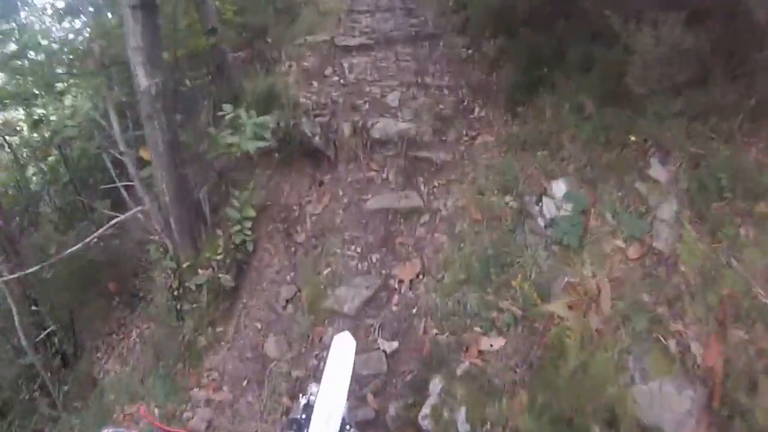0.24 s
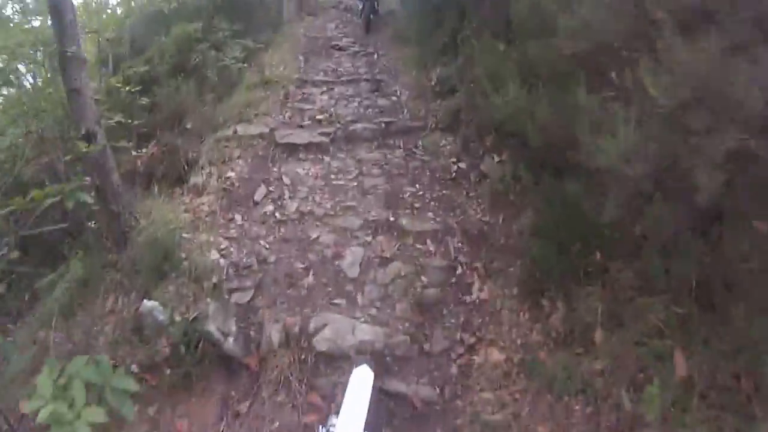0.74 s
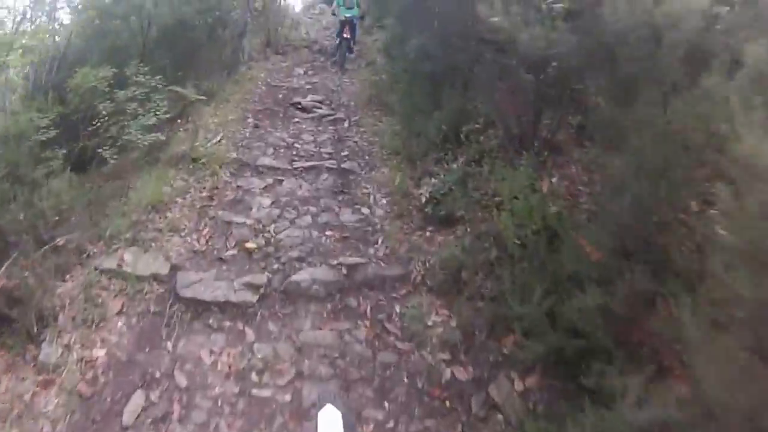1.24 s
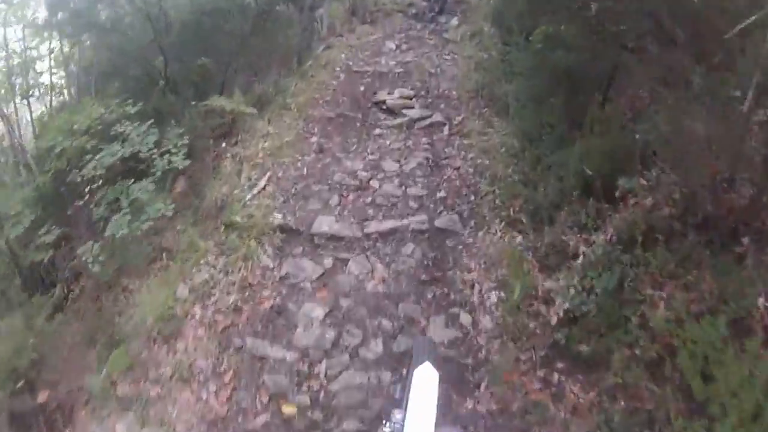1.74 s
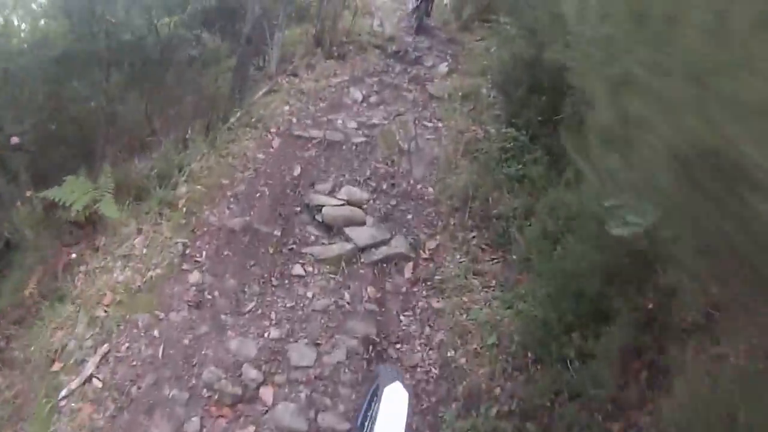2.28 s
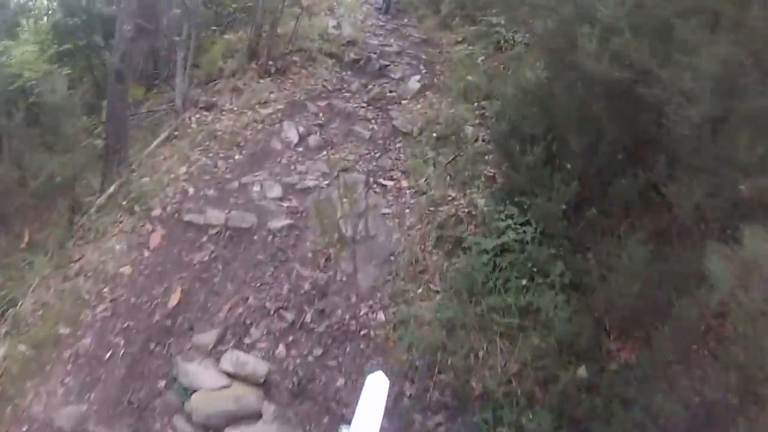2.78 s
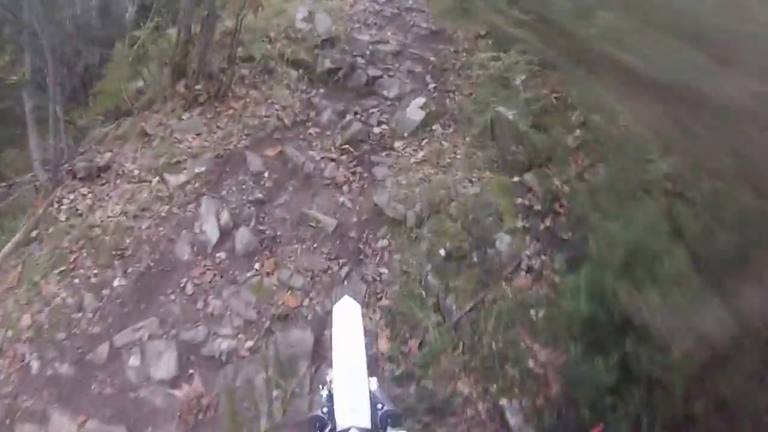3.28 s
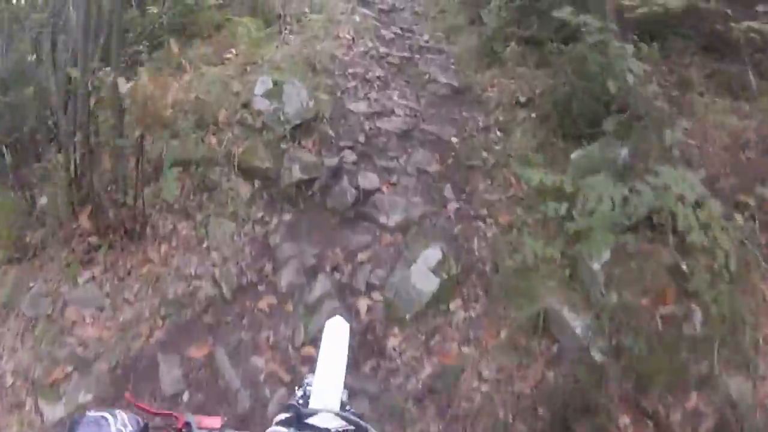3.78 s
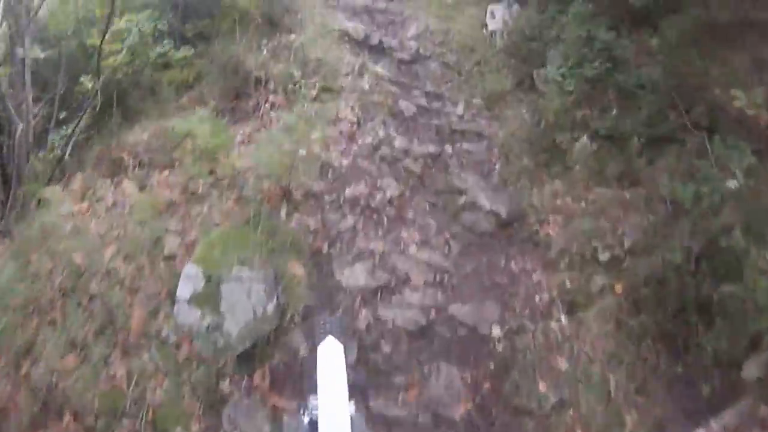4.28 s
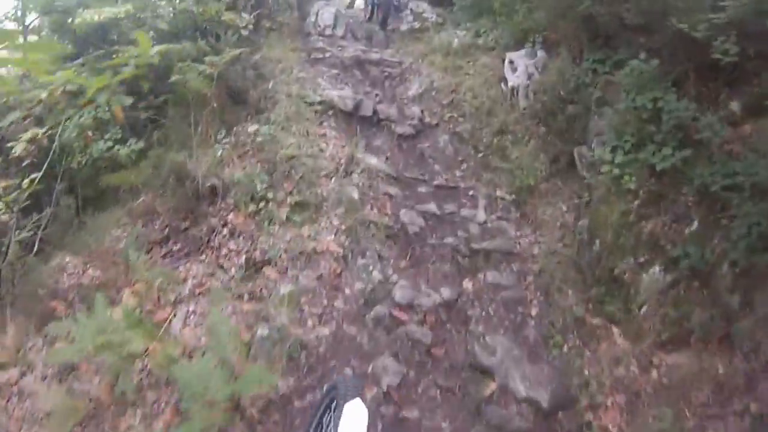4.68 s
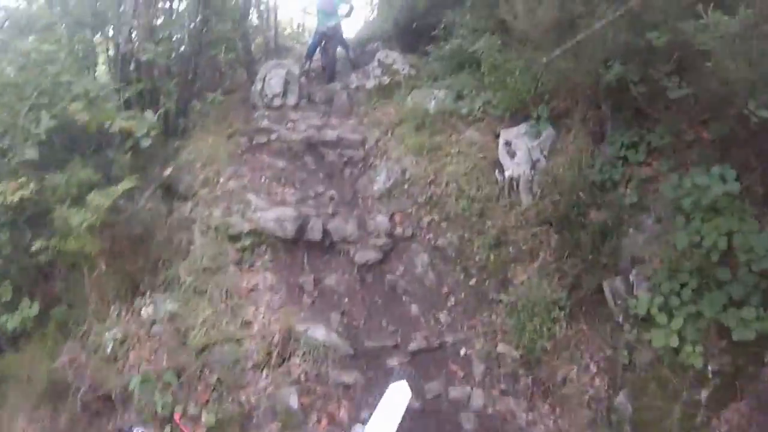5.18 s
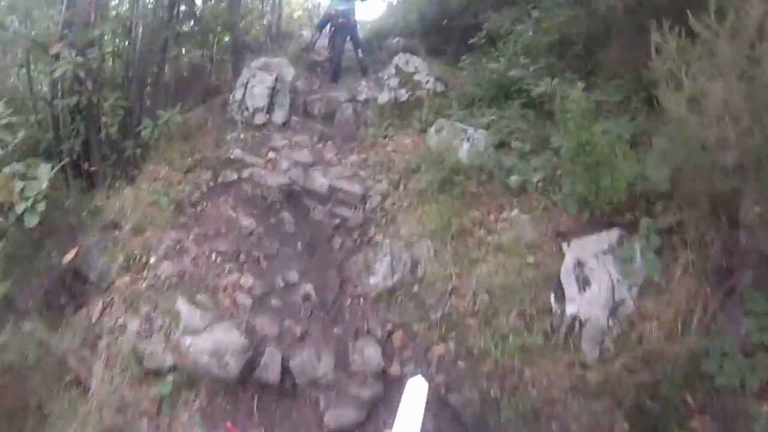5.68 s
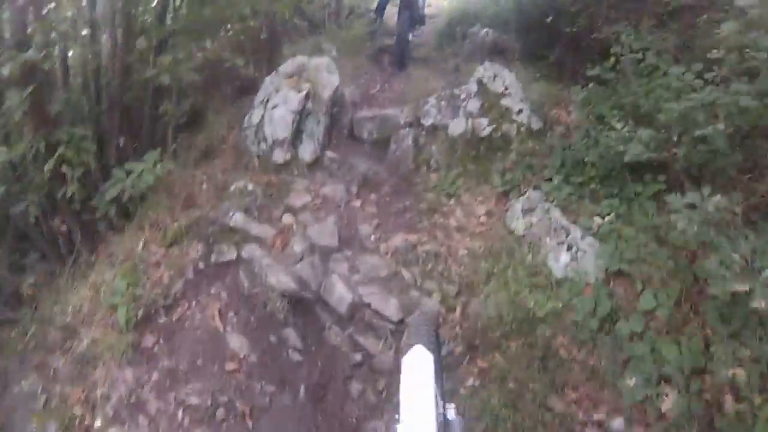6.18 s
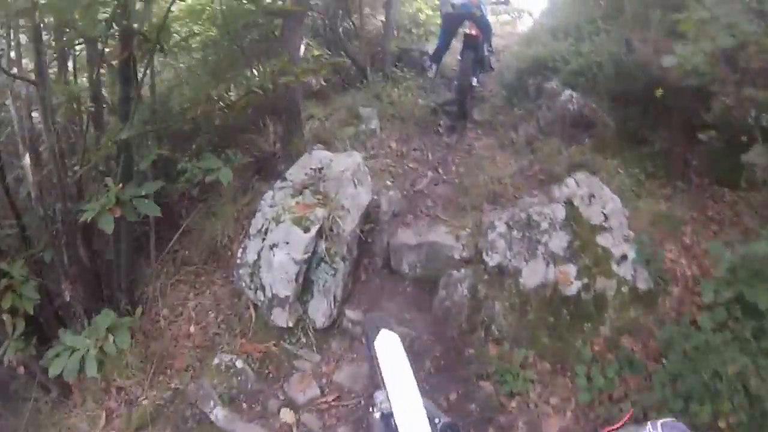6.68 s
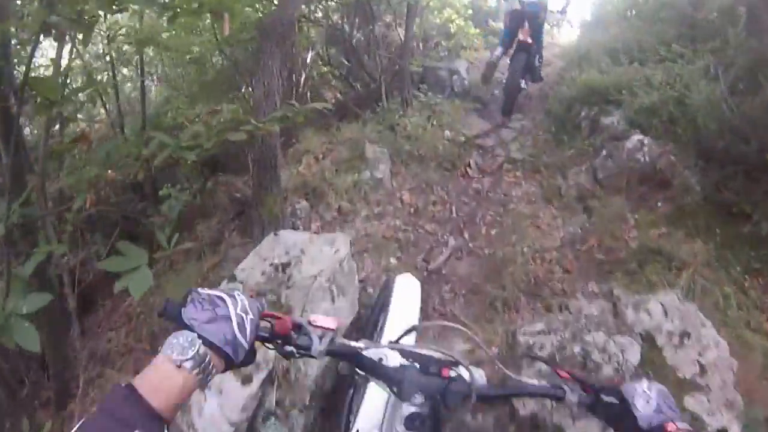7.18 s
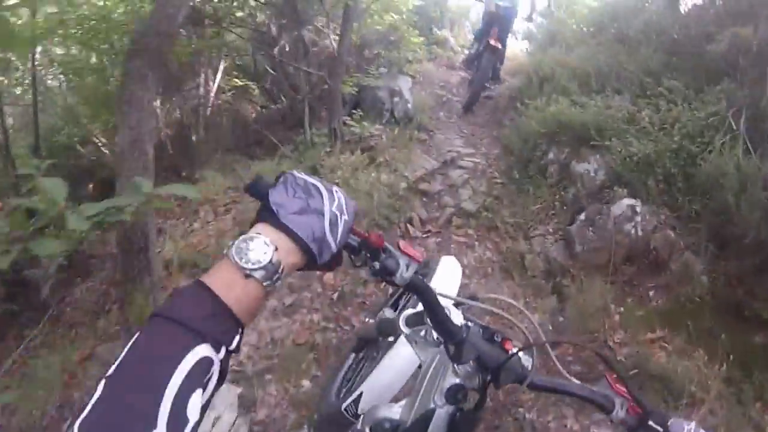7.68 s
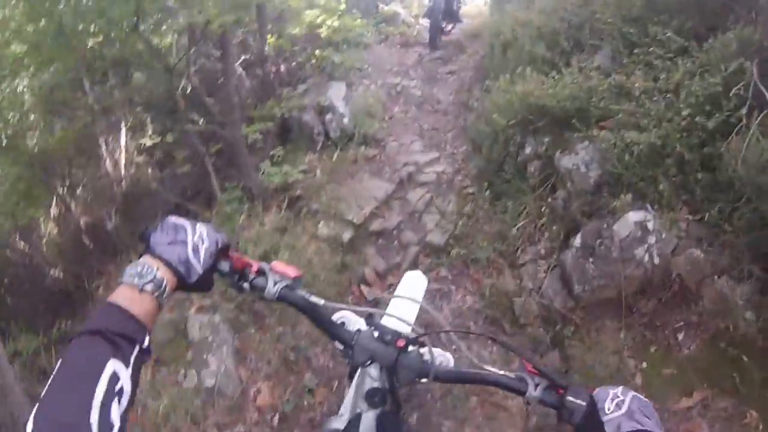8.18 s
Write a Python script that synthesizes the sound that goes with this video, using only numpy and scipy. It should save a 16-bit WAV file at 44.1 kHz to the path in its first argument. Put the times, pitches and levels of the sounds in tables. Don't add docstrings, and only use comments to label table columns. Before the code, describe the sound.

Small motorbike engine revving in short bursts, misfiring between them, with low thuds, rattling case knocks and a brief twig scrape, heard from inside a helmet camera.

```python
import sys
import numpy as np
from scipy import signal
from scipy.fft import rfft, irfft
from scipy.io import wavfile
from scipy.ndimage import uniform_filter1d

SR = 44100
rng = np.random.default_rng(int(sys.argv[2]) if len(sys.argv) > 2 else 0)


def to_wav(sig):
    pcm = np.clip(np.atleast_2d(sig), -1, 1) * 32767
    pcm = np.round(pcm).astype(np.int16)
    wavfile.write(sys.argv[1], SR, pcm.T)


def ratio_of_db(decibels):
    return 10 ** (np.asarray(decibels, float) / 20)


N = 372204

# start in seconds, end in seconds, intake roar in dB,
# air box pitch in Hz, crank speed reached in turns per second.
TWISTS = [(0.181, 0.45, -60.5, 1057, 48.4), (.76, 0.946, -56, 1033, 47), (1.019, 1.22, -68, 930, 50.6),
          (1.551, 1.922, -61, 946, 48.7), (2.281, 2.458, -60.5, 900, 42.4), (2.49, 2.772, -69, 930, 40.5),
          (2.779, 3.2, -60, 1020, 45.2), (3.219, 3.399, -61.5, 905, 41.2), (3.451, 3.64, -66, 935, 46),
          (3.743, 4.4, -63, 920, 43.8), (4.929, 5.149, -61, 940, 46.4), (5.55, 5.881, -71, 890, 42.8),
          (6.199, 6.41, -70, 920, 43.7), (6.601, 6.879, -67, 935, 42.4), (7.02, 7.501, -73, 944, 45),
          (7.701, 8.101, -65.5, 950, 45), (8.11, 8.601, -63, 955, 40)]
# time in seconds, level in dB.
ENGINE_LOAD = [(0, -58.5), (.23, -54), (.4, -64.5), (.61, -61.5), (.82, -56.5), (1.05, -61), (2.7, -59.5),
               (4.09, -58), (4.5, -62.5), (6.6, -59.5), (6.85, -65), (7.03, -64.5), (7.29, -58),
               (7.62, -66), (7.75, -58), (8.05, -56.5), (8.2, -55.5), (8.44, -62)]
# first full firing in seconds, last in seconds.
MISFIRE_STRETCHES = [(.42, .62), (1.04, 1.13), (1.37, 1.53), (1.935, 1.98), (2.056, 2.216), (2.337, 2.628),
                     (3.099, 3.14), (3.204, 3.39), (3.49, 3.71), (3.83, 4.145), (4.35, 4.715), (5.34, 5.47),
                     (6.6, 6.74), (6.82, 7.16), (7.4, 7.65)]
# centre in Hz, width in Hz, level in dB.
EXHAUST_PEAKS = [(234, 97, -3), (305.4, 132, -4.5), (540, 760, -3.5)]
# centre in Hz, width in Hz, level in dB.
METAL_PEAKS = [(1200, 450, -1), (1570, 185, -2.5), (1902, 420, -7), (2386, 460, -3.5), (3100, 550, -14)]
# centre in Hz, width in Hz, level in dB.
HISS_PEAKS = [(3600, 2450, 3.5), (5440, 1030, -2.5), (6890, 1330, -1.5), (9240, 5300, -24),
              (11600, 2500, -7.5)]
# multiple of crank speed, width in Hz, level in dB.
GEAR_TONES = [(39, 50, -12), (85, 110, -25)]
# time in seconds, shake in dB.
GROUND_SHAKE = [(0, -40), (.33, -33.5), (.52, -52), (.87, -42.5), (1.2, -50), (1.36, -41.5), (1.55, -45),
                (3.2, -47.5), (4.5, -48), (5.01, -42.5), (5.19, -44), (5.31, -35), (5.65, -49.5),
                (5.9, -33.5), (6.25, -39), (7.3, -44.5), (7.55, -31), (7.85, -44.5)]
# time in seconds, blow peak in dB, sway in dB.
STONE_LANDINGS = [(0.047, -36, -29.5), (0.169, -31, -30), (0.189, -33, -40), (0.797, -36, -37),
                  (1.812, -35, -39), (3.26, -41.5, -41), (3.927, -32.5, -35), (3.975, -21, -27),
                  (5.141, -44, -27), (5.798, -28, -18.5), (5.937, -29.5, -37), (6.101, -19.5, -28),
                  (6.497, -24, -42), (6.733, -36.5, -24), (7.294, -28.5, -29), (7.544, -27, -41),
                  (7.578, -22.5, -43), (8.142, -27.5, -29)]
# time in seconds, shell peak in dB, sway in dB.
MOUNT_SNAPS = [(.093, -20, -19), (.239, -18, -17), (.753, -32.5, -35), (1.163, -35, -29.5),
               (1.232, -22.5, -29), (1.653, -38.5, -52), (1.718, -40, -35.5), (1.836, -30.5, -44),
               (2.047, -38, -34), (3.402, -23, -28.5), (4.004, -16.5, -31.5), (4.807, -41, -59),
               (4.972, -33.5, -32.5), (5.164, -13.5, -20), (5.284, -19.5, -28), (5.631, -41, -32),
               (5.837, -23, -19), (5.987, -20.5, -24), (6.149, -17.5, -19.5), (6.378, -33, -22.5),
               (6.553, -24, -31), (6.768, -16.5, -51), (6.921, -35, -35), (7.184, -32, -39),
               (7.319, -18.5, -20), (7.685, -20.5, -21), (8.177, -18.5, -21), (8.367, -33.5, -37.5),
               (8.414, -36.5, -35)]
# time in seconds, low mode peak in dB, upper mode in dB, knock in dB.
CASE_RAPS = [(0.0834, -34, -43, -45), (0.0932, -29.5, -30.5, -41.5), (0.171, -40, -45, -41),
             (0.24, -24.5, -35, -31), (.7547, -32, -41, -67), (1.1649, -26, -34, -41),
             (1.2155, -22.5, -31.5, -32.5), (1.231, -34, -41, -49), (1.8213, -36, -39, -35.5),
             (2.4369, -37, -41, -53), (3.9692, -35.5, -41.5, -39), (3.9942, -30.5, -52, -54),
             (4.005, -30.5, -31, -30), (5.159, -30, -46, -46), (5.1659, -17.5, -20.5, -28),
             (5.2544, -39, -32, -43), (5.2805, -29.5, -34, -38.5), (5.835, -26.5, -30, -47),
             (5.9412, -38.5, -32, -42), (5.988, -33.5, -32, -39), (6.149, -26.5, -30.5, -29.5),
             (6.5228, -42, -35.5, -44), (6.5908, -32.5, -46, -41), (6.7671, -30, -31.5, -36.5),
             (7.3215, -23.5, -27, -37), (7.5375, -32.5, -36.5, -46.5), (7.6179, -40, -34.5, -41),
             (7.6853, -29, -27.5, -42), (8.1756, -27, -31, -33), (8.4145, -27.5, -40, -69)]
# time in seconds, low mode peak in dB, upper mode in dB.
CASE_TICKS = [(0.6188, -43.5, -49.5), (0.7767, -41, -43), (1.1324, -43, -50), (1.205, -43, -56),
              (1.5728, -45, -46.5), (2.0578, -44, -58), (2.3833, -45.5, -55), (2.4289, -55, -38.5),
              (2.5807, -40, -56), (2.976, -42.5, -46), (3.0987, -42, -45), (3.14, -42.5, -58),
              (3.2595, -40.5, -40.5), (3.2949, -40, -51), (3.5373, -40, -48), (4.031, -39, -59),
              (4.8023, -40, -47), (4.9749, -42, -41), (5.784, -42, -36), (5.7966, -42, -39),
              (5.8129, -40, -40), (6.091, -38, -49), (6.1814, -40, -46), (6.55, -38.5, -61),
              (6.9114, -41.5, -47.5), (7.192, -35, -46.5), (7.2609, -41.5, -46), (7.5716, -35, -44),
              (8.1171, -36, -55), (8.2881, -38.5, -51)]
# pitch in Hz, t60 in seconds.
CASE_MODES = [(1426, 0.015), (2157, 0.012), (3530, 0.0087), (625, 0.018)]
# start in seconds, length in seconds, start level in dB, end level in dB.
TWIG_SCRAPES = [
    (3.391, 0.066, -33.5, -35),
    (3.392, 0.011, -39, -31),
    (3.408, 0.0052, -25, -35.5),
    (3.422, 0.016, -35, -52),
    (3.458, 0.011, -42, -49),
    (5.166, 0.0054, -56, -61),
    (5.21, 0.0168, -34.5, -42),
    (5.247, 0.0036, -53, -48),
    (5.255, 0.0043, -36, -26.5),
    (2.41, .05, -57, -57),
]
# frequency in Hz, density in dB per Hz.
SCRAPE_COLOUR = [(290, -27), (500, -8.5), (909, -13), (1160, -8.5), (1520, -2.5), (1850, -9), (2330, 1),
                 (3370, -12), (5620, -11.5), (6960, -7.5), (7680, -14.5), (11000, -16.5), (15000, -20)]
# pitch in Hz, t60 in seconds.
BROKEN_TWIG_MODES = [(2540, 0.014), (3100, 0.019)]
# pitch in Hz, level in dB.
ELECTRONIC_TONES = [(10788, -99), (12586, -104), (14384, -90)]

START_TURNS, IDLE_TURNS, SAG_TURNS_PER_S, RISE_S, LEAD_S = 41.4, 29, 40, .16, .09
SHUT_DB = -70.5
LULL_START_S, LULL_END_S, LULL_DB = 5.31, 5.475, -13
SKIP_EVEN, SKIP_MISFIRE, RICH_DB = .1, .75, 2
LOAD_MID_DB, SHAKE_MID_DB = -61, -45
EXHAUST_LAW, METAL_LAW, HISS_LAW = (-56, 0.77), (-58.5, 1.11), (-72, 0.98)
SWAY_LAW, SHELL_LAW = (-44, 1.28), (-54, 0.99)
# (Hz, t60 s)
SWAY, SHELL, BLOW = (38.2, 0.4), (144.2, 0.097), (95.3, 0.13)
THUD, REBOUND = (58, .09), (272, 0.024)
REBOUND_DB, REBOUND_LEAD_S = -10, 0.0017
SHELL_DETUNE, BLOW_DETUNE = .025, .1
LANDING_SHELL_DB = -6.5
SNAP_BLOW_DB, SNAP_BLOW_SLOPE = 3.5, 1.69
TICK_KNOCK_DB, CRACK_DB, CRACK_SLOPE = -6, -8, 1.167


def engine():
    hz = crank()
    load_db, = columns(ENGINE_LOAD)
    intake_db, box_hz, lull_db = throttle()
    at, charge = firings(hz)
    chance = rng.standard_normal((500, 3))[:len(at)]
    s = at / SR + 0.00044 * chance[:, 0]
    fired = spikes(s, charge * ratio_of_db(1.6 * chance[:, 1]))
    exhaust_air, intake_air, metal_air, hiss_air, gear_air = rng.standard_normal((5, N))
    puff = fade(fired, .006)

    exhaust = level(body(fired, EXHAUST_PEAKS), -5)
    exhaust = exhaust + level(body(exhaust_air * (puff + .3), EXHAUST_PEAKS[:2]), -4.5)
    exhaust = exhaust + level(body(exhaust_air * (puff + .3), EXHAUST_PEAKS[2:]), -10)

    gulps = spikes(at / SR + .002, ratio_of_db(.8 * chance[:, 2]))
    intake = level(glide(gulps, box_hz, 140), -2)
    intake = intake + level(glide(intake_air * (fade(gulps, .012) + .5), box_hz, 230), -7)

    metal = level(body(metal_air * (puff + .6) * ratio_of_db(2.2 * walk(30)), METAL_PEAKS), -1)
    metal = metal + level(body(fired, METAL_PEAKS), -15)
    metal = metal + sum(level(glide(gear_air, k * hz, w), db) for k, w, db in GEAR_TONES)
    hiss = level(body(hiss_air * (puff + .5) * ratio_of_db(1.97 * walk(20)), HISS_PEAKS), 0)

    treble = follow(load_db, LOAD_MID_DB, METAL_LAW) * metal + follow(load_db, LOAD_MID_DB, HISS_LAW) * hiss
    bass = follow(load_db, LOAD_MID_DB, EXHAUST_LAW) * exhaust
    return bass + ratio_of_db(intake_db) * intake + ratio_of_db(lull_db) * treble


def crank():
    s, hz = [-1.], [START_TURNS]
    last_end, last_top = 0, START_TURNS
    for start, end, _, _, top in TWISTS:
        start, end = start - LEAD_S, end - LEAD_S
        sagged = last_top - SAG_TURNS_PER_S * max(start - last_end, 0)
        s += [start, min(start + RISE_S, end - .001), end]
        hz += [max(sagged, IDLE_TURNS), top, top]
        last_end, last_top = end, top
    return np.interp(np.arange(N) / SR, np.maximum.accumulate(s), hz)


def throttle():
    t = np.arange(N) / SR
    db, hz = np.full(N, SHUT_DB), np.full(N, 930.)
    for start, end, open_db, box_hz, _ in TWISTS:
        is_open = (t > start) & (t < end)
        db[is_open], hz[is_open] = open_db, box_hz
    lull_db = LULL_DB * ((t > LULL_START_S) & (t < LULL_END_S))
    return [uniform_filter1d(1. * c, int(0.032 * SR)) for c in (db, hz, lull_db)]


def firings(hz):
    turns = np.cumsum(hz / SR)
    start, end = np.transpose(MISFIRE_STRETCHES)
    edges = np.ravel(MISFIRE_STRETCHES)
    passed = turns[(edges * SR).astype(int)]
    turns = turns + np.interp(np.arange(N) / SR, edges, np.round(passed) - passed)
    at = np.searchsorted(turns, np.arange(1, int(turns[-1])))
    stretch = np.clip(np.searchsorted(start * SR - 2, at) - 1, 0, None)
    odd = (np.arange(1, len(at) + 1) - np.round(passed[::2])[stretch]) % 2
    lean = (at > start[stretch] * SR - 2) & (at < end[stretch] * SR + 2)
    lost = odd * np.where(lean, SKIP_MISFIRE, SKIP_EVEN)
    return at, np.clip(1 - lost, .05, 1) * ratio_of_db(RICH_DB * lean)


def mount():
    s, shell_db, sway_db, blow_db = jolt_rows()
    s = s + .003
    blow = spikes(s, ratio_of_db(blow_db + 3))
    rebound = spikes(s - REBOUND_LEAD_S, ratio_of_db(shell_db + 5 + REBOUND_DB))
    jolts = ring_loose(spikes(s, ratio_of_db(shell_db + 6.5)), s, *SHELL, SHELL_DETUNE)
    jolts = jolts + ring(spikes(s, ratio_of_db(sway_db + 4.5)), *SWAY)
    jolts = jolts + ring_loose(blow, s, *BLOW, BLOW_DETUNE) + 1.12 * ring(blow, *THUD)
    jolts = uniform_filter1d(jolts - ring(rebound, *REBOUND), int(0.0021 * SR))

    shake_db, = columns(GROUND_SHAKE)
    bumps = rng.standard_normal((2, N)) * ratio_of_db(3 * walk(20))
    sway = even(band(band(band(bumps[0], 37, 16), 37, 30), 37, 40), .25)
    shell = even(band(band(ring(bumps[1], *SHELL), 150, 120), 150, 200), .25)
    hum = follow(shake_db, SHAKE_MID_DB, SWAY_LAW) * sway + follow(shake_db, SHAKE_MID_DB, SHELL_LAW) * shell
    return hum - jolts


def jolt_rows():
    s, blow_db, sway_db = np.transpose(STONE_LANDINGS)
    snap_s, shell_db, snap_sway_db = np.transpose(MOUNT_SNAPS)
    return np.hstack([[s, blow_db + LANDING_SHELL_DB, sway_db, blow_db],
                      [snap_s, shell_db, snap_sway_db, SNAP_BLOW_DB + SNAP_BLOW_SLOPE * shell_db]])


def case():
    s, *mode_db = tick_rows()
    latest = np.clip(np.searchsorted(s * SR - 1, np.arange(N)) - 1, 0, None)
    detune = rng.standard_normal((len(s), len(CASE_MODES)))
    crack = fade(spikes(s, ratio_of_db(mode_db[2] - 8)), 0.00089) * rng.standard_normal(N)
    out = band(crack, 4900, 4000)
    for k, (hz, t60) in enumerate(CASE_MODES):
        tap = spikes(s, ratio_of_db(mode_db[k]))
        chatter = (fade(tap, 0.003) - fade(tap, 0.00071)) * rng.standard_normal(N)
        width = 3.42 / t60 * 2
        pitch = hz * (1 + 0.03 * detune[latest, k])
        out = out + glide(0.83 * tap + 0.17 * chatter, pitch, width) * SR / width
    return out


def tick_rows():
    hard = list(map(tuple, CASE_RAPS))
    light = [(s, low_db, up_db, low_db + TICK_KNOCK_DB) for s, low_db, up_db in CASE_TICKS]
    s, low_db, up_db, knock_db = np.transpose(sorted(hard + light))
    return s, low_db, up_db, CRACK_DB + CRACK_SLOPE * up_db, knock_db


def twigs():
    t, push = np.arange(N) / SR, np.zeros(N)
    for s, length, start_db, end_db in TWIG_SCRAPES:
        path_db = start_db + (end_db - start_db) * np.clip((t - s) / length, 0, 1)
        push += ratio_of_db(path_db) * (t > s) * (t < s + length)
    grains = rng.standard_normal(N) * ratio_of_db(0.71 * rng.exponential(size=N))
    hz, db = np.transpose(SCRAPE_COLOUR)
    gain = ratio_of_db(np.interp(np.log(np.fft.rfftfreq(N, 1 / SR) + 1), np.log(hz), db, -80, -80))
    drag = level(irfft(rfft(grains) * gain, N), 0)
    drag = np.where(abs(t - 3.5) > .5, band(drag, 2800, 5000), drag)
    return drag * uniform_filter1d(push, int(.001 * SR)) * ratio_of_db(2.1 * walk(250))


def twig_snap():
    hit = uniform_filter1d(spikes(np.array([5.2555]), [ratio_of_db(-20)]), size=5)
    return sum(ring(hit, hz, t60) for hz, t60 in BROKEN_TWIG_MODES)


def creak():
    start_s, length_s, first_hz, last_hz = 4.768, .034, 390, 480
    t = np.arange(N) / SR - start_s
    rate = first_hz + (last_hz - first_hz) * t / length_s
    turns = np.cumsum(rate * (t > 0) * (t < length_s) / SR)
    slips = np.diff(np.floor(turns), prepend=0) * ratio_of_db(2.2 * walk(200))
    modes = ring(slips, 1640, 0.0064) + 0.75 * ring(slips, 822, 0.008) + 0.93 * ring(slips, 334, 0.014)
    return ratio_of_db(-42.5) * modes


def electronics():
    t = np.arange(N) / SR
    whine = sum(np.sqrt(2) * ratio_of_db(db) * np.sin(2 * np.pi * hz * t) for hz, db in ELECTRONIC_TONES)
    return whine + level(band(rng.standard_normal(N), 7600, 11000), -82)


def level(x, db):
    return x * ratio_of_db(db) / np.sqrt(np.mean(x ** 2))


def columns(table):
    s, *rest = np.transpose(table)
    return [np.interp(np.arange(N) / SR, s, c) for c in rest]


def follow(control_db, middle_db, law):
    middle_gain_db, slope = law
    return ratio_of_db(middle_gain_db + slope * (control_db - middle_db))


def spikes(s, size):
    return np.bincount(np.clip((s * SR).astype(int), 0, N - 1), size, N)


def fade(x, tau):
    return signal.lfilter([1], [1, -np.exp(-1 / (tau * SR))], x)


def ring(x, hz, t60):
    pole = np.exp(2j * np.pi * hz / SR - np.log(1000) / (t60 * SR))
    return signal.lfilter([1], [1, -pole], x).imag


def ring_loose(x, s, hz, t60, detune):
    pitches = hz * (1 + detune * rng.standard_normal(len(s)))
    latest = np.clip(np.searchsorted(np.sort(s) * SR - 1, np.arange(N)) - 1, 0, None)
    turn = np.exp(2j * np.pi * np.cumsum(pitches[latest]) / SR)
    pole = np.exp(-np.log(1000) / (t60 * SR))
    return (signal.lfilter([1], [1, -pole], x / turn) * turn).imag


def band(x, hz, width):
    return signal.lfilter(*signal.iirpeak(hz, hz / width, SR), x)


def body(x, peaks):
    out = 0
    for k, (hz, width, db) in enumerate(peaks):
        gain = (-1) ** k * ratio_of_db(db) * np.sqrt(1000 / width)
        out = out + gain * band(band(x, hz, width), hz, width)
    return out


def glide(x, hz, width):
    turn = np.exp(2j * np.pi * np.cumsum(hz) / SR)
    pole = np.exp(-np.pi * width / SR)
    return (signal.lfilter([(1 - pole) ** 2], [1, -2 * pole, pole ** 2], x / turn) * turn).real


def even(x, span):
    return x / np.sqrt(uniform_filter1d(x ** 2, int(span * SR)))


def walk(rate):
    k = int(SR / rate)
    held = np.repeat(rng.standard_normal(N // k + 1), k)
    return 1.48 * uniform_filter1d(uniform_filter1d(held, k), k)[:N]


def scene():
    return (engine() + mount() + case() + twigs() + twig_snap() + creak() + electronics())[None]


def low_pass(x):
    return signal.sosfilt(signal.butter(12, 16190, fs=SR, output="sos"), x)


def record(dry):
    wet = .75 * np.tanh(dry / 0.78)
    wet = signal.sosfilt(signal.butter(2, 20, "high", fs=SR, output="sos"), wet)
    wet = signal.sosfilt(signal.ellip(8, .2, 60, 15250, fs=SR, output="sos"), wet)
    return low_pass(wet)


dry = scene()
out = record(dry)
to_wav(out)
```